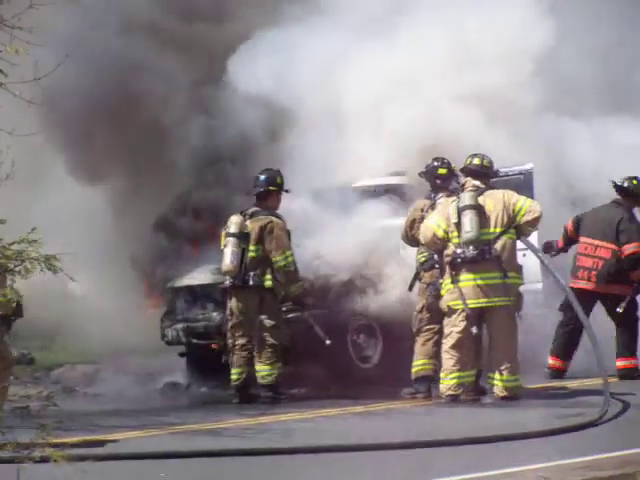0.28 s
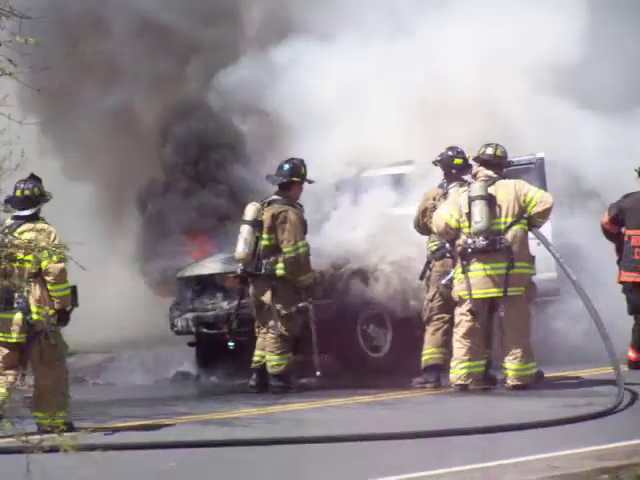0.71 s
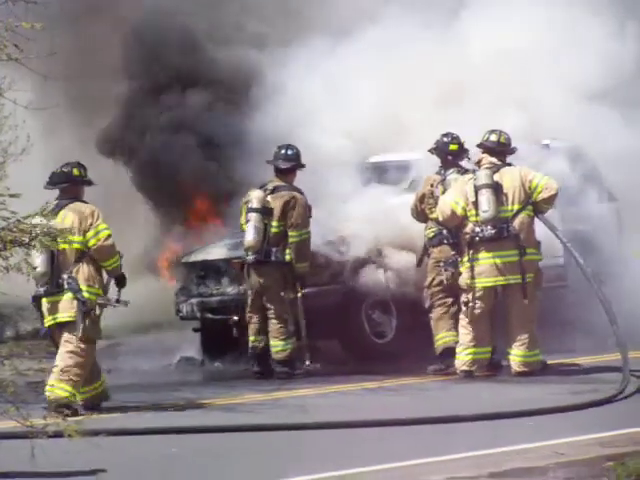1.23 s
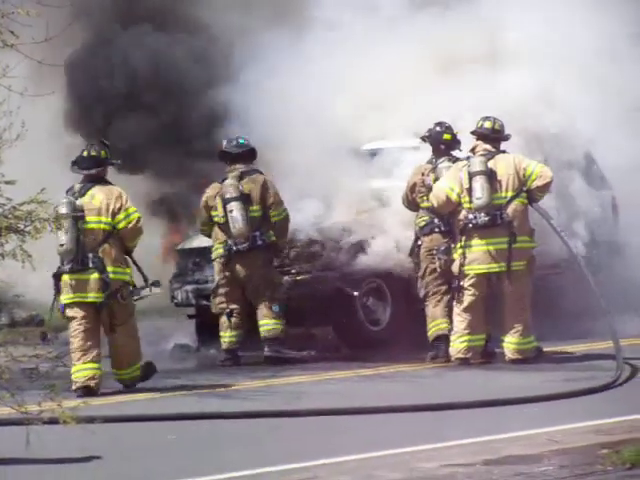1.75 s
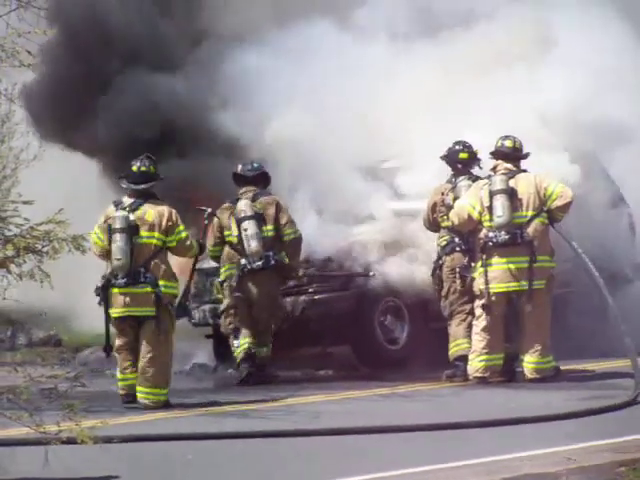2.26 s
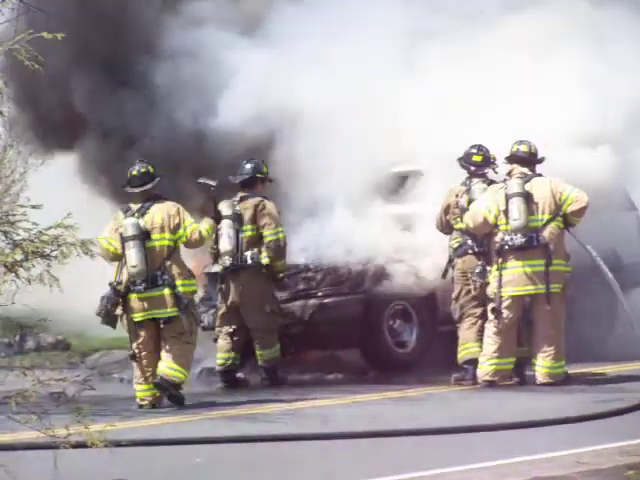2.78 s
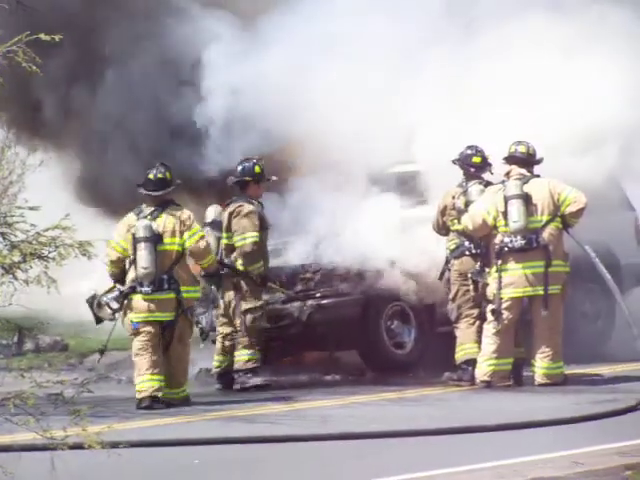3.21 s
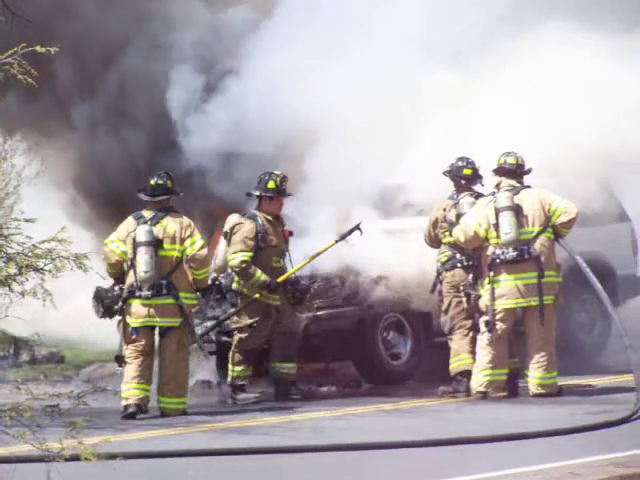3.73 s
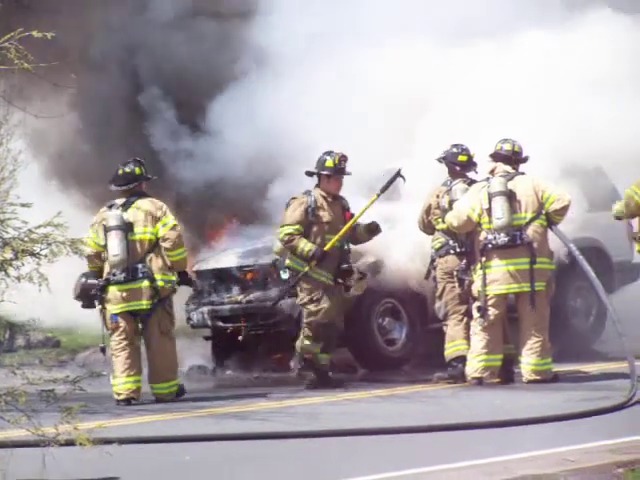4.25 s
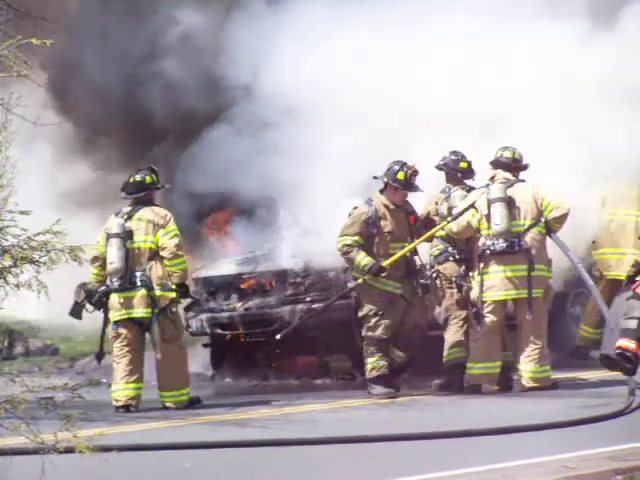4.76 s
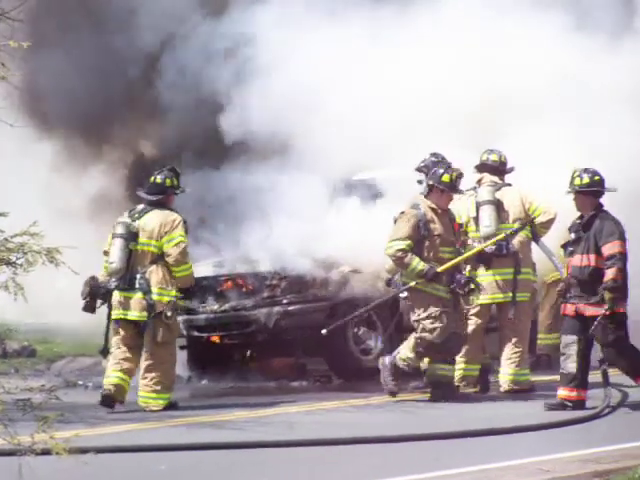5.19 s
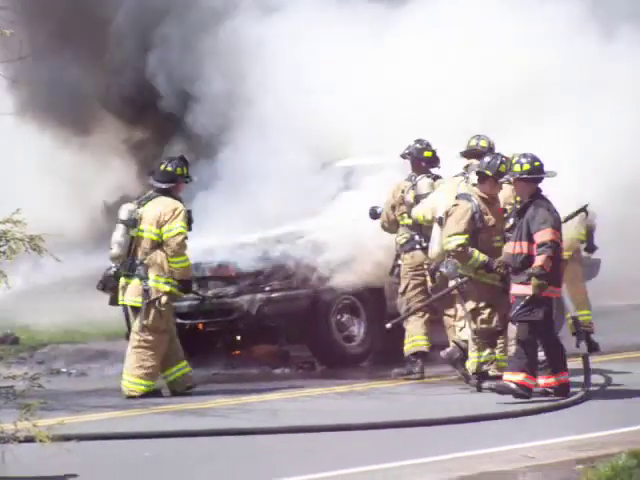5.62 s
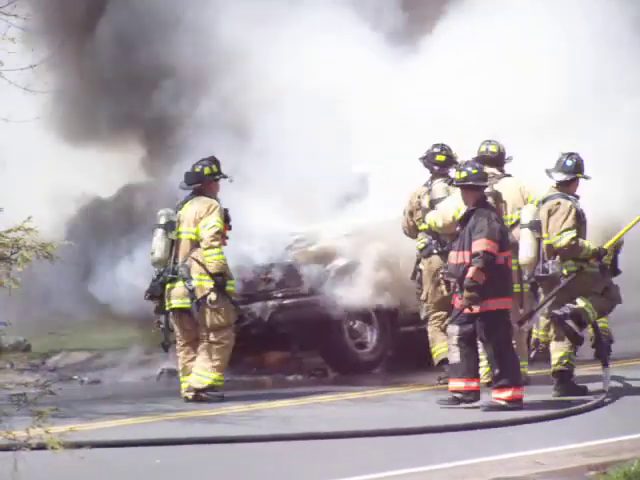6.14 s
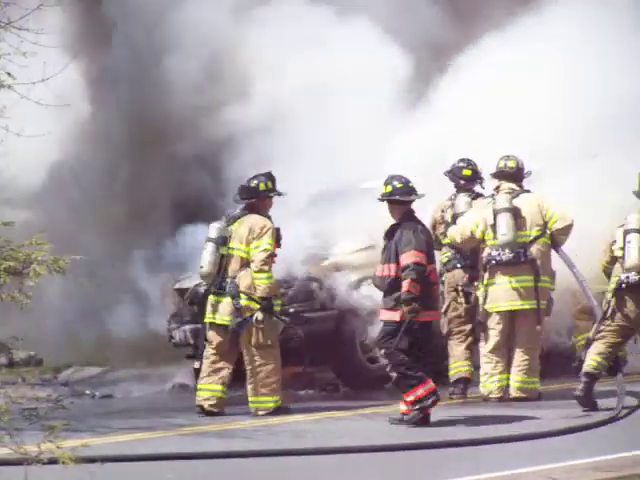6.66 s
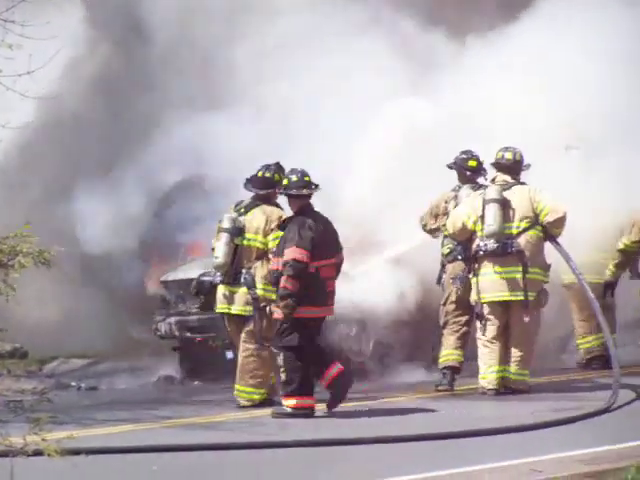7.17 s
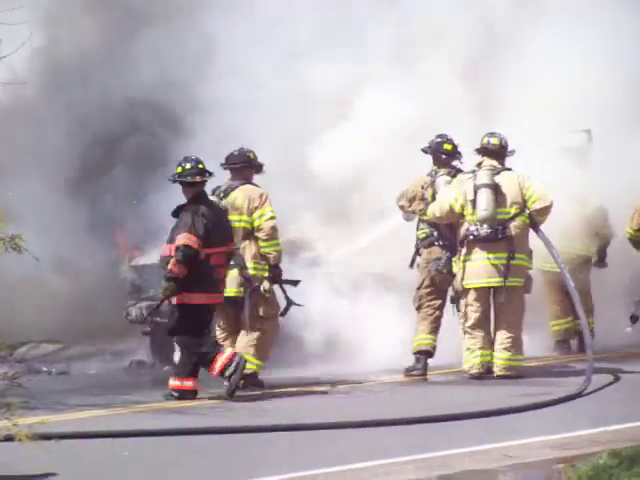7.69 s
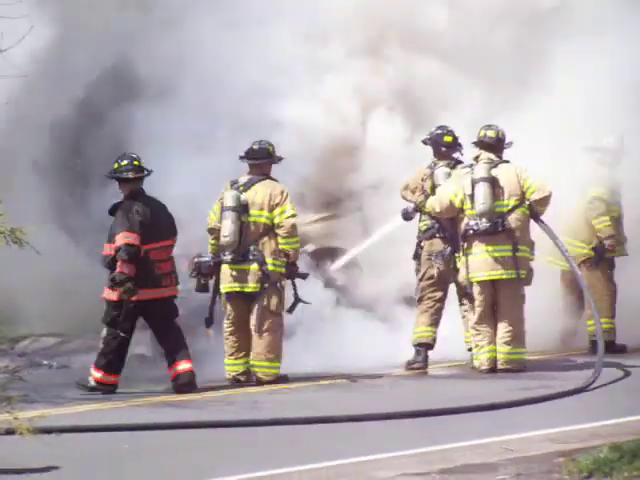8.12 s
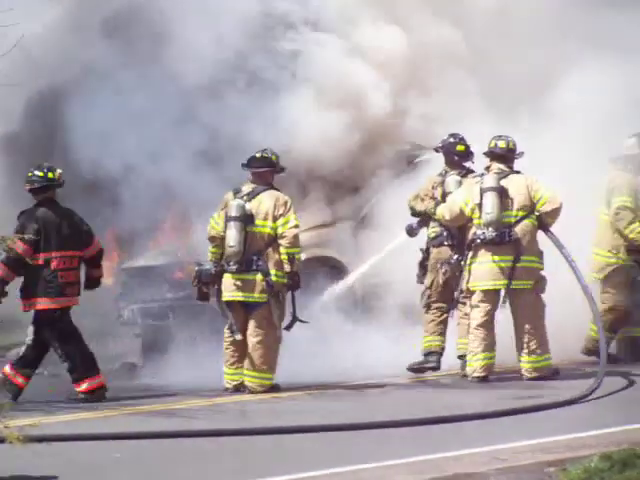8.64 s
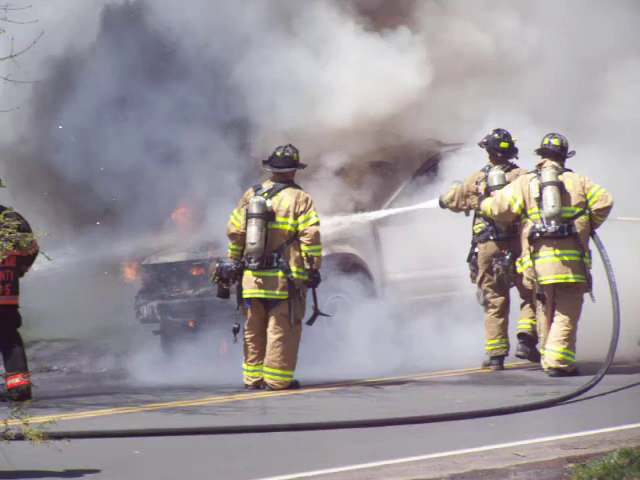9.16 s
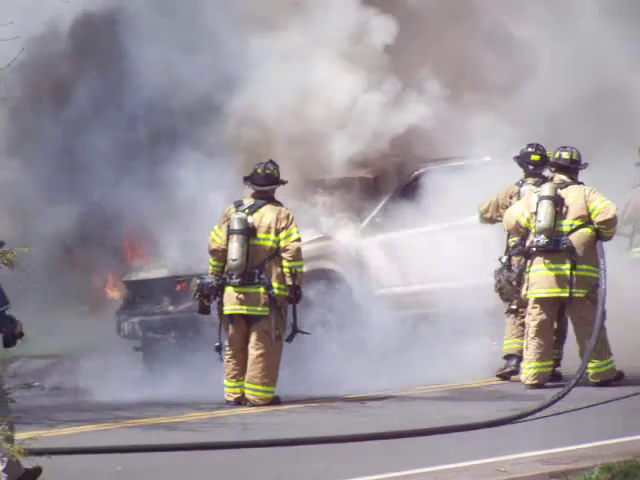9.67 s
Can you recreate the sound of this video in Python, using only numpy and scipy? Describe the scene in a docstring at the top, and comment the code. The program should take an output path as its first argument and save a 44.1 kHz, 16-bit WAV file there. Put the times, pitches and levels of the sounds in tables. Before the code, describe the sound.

A fire engine holds a steady high idle on an open street, its low exhaust drone topped by light clatter and a faint pump whine. A hose nozzle hisses throughout. The water jet flicks across a car in short splashes, and a dry double tap sounds once. Later the jet stays on in loud passes, splashing and drumming on sheet metal while the microphone's level dips. The engine sags slightly before one last splash.

```python
"""A fire engine holds a high idle to drive its pump beside a burning car on an open street.
Throughout, the exhaust drones, the block clatters and a hose nozzle hisses. At first the jet only
flicks across the car; a dry double tap sounds at 3.2 s. From 6.1 to 9 s the jet is held on in passes,
splashing and drumming on the sheet metal, and a gain control ducks everything while the water is loud.
The engine sags a little, and the jet lands once more at 9.8 s."""
import sys
import numpy as np
from scipy import signal
from scipy.fft import rfft, irfft, next_fast_len
from scipy.io import wavfile

SR = 44100
rng = np.random.default_rng(int(sys.argv[2]) if len(sys.argv) > 2 else 0)


def inscribe(sig):
    """Save sig as 16-bit PCM at rate SR to the path in sys.argv[1].

    A 1-D sig is mono; a 2-D sig holds one channel per row.
    Samples are clipped to [-1, 1] before scaling.
    """
    pcm = np.round(np.clip(np.atleast_2d(sig).T, -1, 1) * 32767)
    wavfile.write(sys.argv[1], SR, pcm.astype(np.int16))


N = 436590
TIME = np.arange(N) / SR


def from_db(db):
    """Decibels to gain."""
    return 10 ** (np.asarray(db) / 20)


def rms_one(x):
    """Scale to unit power."""
    return x / np.sqrt(np.mean(x ** 2) + 1e-20)


def drift(rate_hz):
    """Slow random wander, rms about 1."""
    hop, settle = 40, 2000
    r = np.exp(-2 * np.pi * rate_hz * hop / SR)
    noise = rng.standard_normal(N // hop + settle + 2)
    slow = signal.lfilter([1], [1, -2 * r, r * r], noise)[settle:]
    return np.interp(np.arange(N) / hop, np.arange(len(slow)), rms_one(slow))


def swells(rows):
    """Gaussian rises and falls; one gain curve per level column."""
    return sum(from_db(levels_db)[:, None] * np.exp(-np.minimum((2 * (TIME - mid_s) / length_s) ** 2, 20))
               for mid_s, length_s, *levels_db in rows)


def coloured(x, spectrum):
    """Apply a spectrum, falling 30 dB per octave beyond its ends; rms 1."""
    size = next_fast_len(N)
    hz, db = np.transpose(spectrum)
    octave, points = np.log2(np.fft.rfftfreq(size, 1 / SR) + 1), np.log2(hz)
    beyond = np.abs(octave - np.clip(octave, points[0], points[-1]))
    gain = from_db(np.interp(octave, points, db) - 30 * beyond)
    return rms_one(irfft(rfft(x, size) * gain, size)[:N])


def resonate(x, modes, top_hz=6000):
    """Steep parallel resonances, each driven by a differently shifted copy of x; rms 1."""
    out = 0
    for k, (hz, width_hz, db) in enumerate(modes):
        r = np.exp(-np.pi * width_hz / SR)
        b = (1 - r * r) / 2 * np.array([1, 0, -1])
        a = [1, -2 * r * np.cos(2 * np.pi * hz / SR), r * r]
        drive = np.roll(x, k * SR)
        out = out + from_db(db) * signal.lfilter(b, a, signal.lfilter(b, a, drive))
    return rms_one(signal.sosfilt(signal.butter(6, top_hz, fs=SR, output="sos"), out))


# hum lines: f/Hz, rms level/dB
HUM_LINES = [(128.2, -34.5), (178.3, -38.5), (256.5, -37), (358, -45.5), (567, -60.5)]

def hum(waver_db):
    """Faint tones, not locked to the crankshaft, that beat against the engine."""
    out = 0
    for hz, db in HUM_LINES:
        gain = from_db(db + waver_db * drift(0.95))
        out = out + gain * np.sin(2 * np.pi * hz * TIME + drift(0.78))
    return np.sqrt(2) * out


def tones(cycles, lines, waver_db):
    """Lines locked to the crankshaft, wavering on their way through the air."""
    out = 0
    for order, db in lines:
        gain = from_db(db + waver_db * drift(1.0))
        out = out + gain * np.sin(2 * np.pi * (round(order) * cycles + rng.random()))
    return np.sqrt(2) * out


# whine lines: order (multiple of the cycle rate), rms level/dB
WHINE_ORDERS = [(32, -55), (35, -55), (36, -47.5), (38, -50.5), (42, -48.5), (44, -44.5), (45, -50),
                (46, -57), (47, -54), (50, -54.5), (51, -59.5), (53, -55), (56, -49.5), (57, -52.5)]

def whine(cycles):
    """Pump and gears sing at high orders of the engine cycle."""
    return tones(cycles, WHINE_ORDERS, waver_db=1.0)


# exhaust overtones: order, relative level/dB
OVERTONE_ORDERS = [(20, 4), (24, -4), (28, -5.5)]
# their swells: middle t/s, length/s, level/dB
OVERTONE_SWELLS = [(1.83, 0.22, -55), (3.87, .3, -53), (6.03, 0.23, -41.5)]

def overtones(cycles, rest_db):
    """Upper exhaust orders that swell now and then."""
    gain = from_db(rest_db) + swells(OVERTONE_SWELLS)[0]
    return gain * tones(cycles, OVERTONE_ORDERS, waver_db=1.5)


# block clatter spectrum: f/Hz, relative density/dB
CLATTER_SPECTRUM = [(400, -7.5), (650, -16.5), (800, -3), (1000, -3.5), (1250, -1.5), (1600, -6.5),
                    (2200, -3), (3000, -10), (5000, -23), (8000, -46.5)]

def clatter(cycles, repeating, throb):
    """Valves and injectors rattle partly alike in every cycle, partly at random."""
    size = 2048
    one_cycle = irfft(np.exp(2j * np.pi * rng.random(size // 2 + 1)))
    alike = rms_one(np.interp(cycles % 1 * size, np.arange(size), one_cycle))
    beat = 1 + throb * sum(np.cos(2 * np.pi * order * cycles) for order in (2, 3, 8))
    return coloured((repeating * alike + rng.standard_normal(N)) * beat, CLATTER_SPECTRUM)


# rumble spectrum: f/Hz, relative density/dB
RUMBLE_SPECTRUM = [(8, -10), (25, -6), (80, -2), (160, 0), (330, -.5), (400, -5.5), (560, -13), (700, -16),
                   (1200, -32)]

def rumble():
    """Steady low engine noise."""
    return coloured(rng.standard_normal(N), RUMBLE_SPECTRUM)


# exhaust harmonics: order, relative level/dB
EXHAUST_ORDERS = [(2, -37.5), (3, -35.5), (4, -2.5), (5, -10), (6, -15.5), (7, -15.5), (8, -20.5), (9, 2),
                  (10, -10.5), (11, -5), (12, -1.5), (13, -11), (14, -26), (15, -10.5), (16, -7.5),
                  (17, -14), (18, -33), (19, -32.5), (20, -44.5), (21, -29), (22, -31.5)]

def exhaust(cycles, wander_db, uneven_db, imbalance_rad):
    """Each cycle sends one lopsided train of puffs down the pipe, which rings after it."""
    size = 256
    orders, db = np.transpose(EXHAUST_ORDERS)
    log_gain = np.log(from_db(np.interp(np.arange(size // 2 + 1), orders, db)))
    pipe_rad = 2 * rfft(irfft(log_gain)[:size // 2], size).imag  # causal pipe: minimum phase
    out = 0
    for order, level_db in EXHAUST_ORDERS:
        k = int(round(order))
        lag_rad = imbalance_rad * (k % 2)  # odd orders come from unequal cylinders and trail
        phase = 2 * np.pi * k * cycles + pipe_rad[k] - lag_rad
        out = out + from_db(level_db + wander_db * drift(0.75)) * np.cos(phase)
    return rms_one(out) * from_db(uneven_db * drift(8.4))


# governed speed, sagging at the end: t/s, working cycle rate/Hz
ENGINE_SPEED = [(0, 21.70), (1.8, 21.79), (6.2, 21.80), (8.1, 21.865), (9, 21.62), (9.9, 21.51)]

def engine():
    """Drone, whine and clatter follow the governed speed, over a steady rumble."""
    rate_hz = np.interp(TIME, *np.transpose(ENGINE_SPEED))
    cycles = np.cumsum(rate_hz * (1 + 0.00046 * drift(6.7))) / SR
    drone = from_db(-16.6) * exhaust(cycles, wander_db=0.3, uneven_db=0.12, imbalance_rad=1.25)
    high_tones = whine(cycles) + overtones(cycles, rest_db=-53)
    block = from_db(-35.0) * clatter(cycles, repeating=0.39, throb=0.19)
    return drone + high_tones + block + from_db(-33.5) * rumble()


# blows: t/s, level/dB
KNOCK_BLOWS = [(3.211, -30), (3.218, -24)]
# struck modes: f/Hz, gain/dB, t60/s
KNOCK_RING = [(520, -11, 0.053), (690, -6, 0.024), (880, -6, 0.028), (1100, 5, .025), (1370, 0, .025),
              (1700, 3, 0.014), (2180, -2, .02)]

def knocks():
    """A dry double tap by the car: each blow rings the same damped modes."""
    clicks, out = np.zeros(N), 0
    for t_s, db in KNOCK_BLOWS:
        clicks[int(t_s * SR)] = from_db(db)
    for hz, db, t60_s in KNOCK_RING:
        r, w = from_db(-60 / (t60_s * SR)), 2 * np.pi * hz / SR
        ring = signal.lfilter([0, np.sin(w)], [1, -2 * r * np.cos(w), r * r], clicks + 1e-18)
        out = out + from_db(db) * ring
    return out


def droplets(per_s, size_db, mist, sputter_db):
    """Drop impacts of uneven size in fine mist; the stream breaks into slugs and sputters."""
    sizes = from_db(size_db * np.minimum(rng.exponential(1, N), 4)) * rng.choice([-1, 1], N)
    hits = rms_one(sizes * (rng.random(N) < per_s / SR))
    return (hits + mist * rng.standard_normal(N)) * from_db(sputter_db * drift(45))


# nozzle hiss spectrum: f/Hz, relative density/dB
NOZZLE_SPECTRUM = [(1300, -29), (1700, -15.5), (2180, -0.5), (2600, -12.5), (2850, -3.5), (3150, -10.5),
                   (3600, -5.5), (4050, 1), (4450, -3.5), (5100, -10.5), (5700, -19.5), (6500, -28.5),
                   (7200, -28), (8500, -46)]

def nozzle(level_db):
    """Water tears out of the wide-open nozzle into a fine spray."""
    spray = droplets(per_s=5000, size_db=2.5, mist=1.4, sputter_db=0.34)
    return from_db(level_db) * coloured(spray, NOZZLE_SPECTRUM)


# jet held on the car: start t/s, rise/s, length/s, splash/dB, panel/dB, wheel well/dB, fade/(dB/s)
JET_PASSES = [(6.125, 0.027, 0.12, -16.5, -18.5, -17.5, -3), (6.247, .05, 0.25, -24, -33, -31, 29),
              (7.074, 0.057, 0.28, -19.5, -22, -35, 23), (7.3, 0.25, 0.8, -14.5, -23, -10.5, 5.5),
              (8.255, 0.05, 0.756, -19.5, -26.5, -24, 11), (9.792, 0.037, .12, -26, -27, -42, 2)]

def passes(run_off_db_per_s, wobble_db, wobble_hz):
    """The hand-held jet lands, wobbles, slides off the metal: gains of splash, panel and wheel well."""
    gains = 0
    for start_s, rise_s, length_s, *levels_db, fade_db_per_s in JET_PASSES:
        age_s = np.maximum(TIME - start_s, 0)
        slide_db = fade_db_per_s * np.minimum(age_s, length_s)
        run_off_db = run_off_db_per_s * np.maximum(age_s - length_s, 0)
        envelope = np.minimum(age_s / rise_s, 1) * from_db(-np.minimum(slide_db + run_off_db, 100))
        gains = gains + from_db(levels_db)[:, None] * envelope
    return [gain * from_db(wobble_db * drift(wobble_hz)) for gain in gains]


# jet flicking across the car: middle t/s, length/s, splash/dB, panel/dB, slap/dB
JET_FLICKS = [(0.036, 0.058, -27, -31, -46), (0.239, 0.08, -24, -31, -37), (0.368, 0.026, -23, -21.5, -25),
              (0.384, 0.009, -20.5, -23, -16), (1.71, 0.13, -24.5, -32, -54),
              (2.839, 0.1, -23.5, -24.5, -27), (5.464, 0.035, -26, -27, -35), (5.826, 0.044, -25, -32, -45),
              (6.01, 0.09, -21.5, -30.5, -58), (6.331, 0.0032, -14, -41, -42), (6.52, 0.03, -33, -29, -48),
              (7.23, 0.19, -51, -50, -29)]
# splash spectrum: f/Hz, relative density/dB
SPLASH_SPECTRUM = [(600, -16.5), (1200, -7.5), (2000, -10.5), (2650, -18), (2950, -5.5), (3300, -4.5),
                   (3700, 5.5), (4300, 2.5), (4700, -1.5), (5200, -3), (5750, -16), (6250, -22.5),
                   (6700, -18), (8500, -43)]
# resonances under the jet: f/Hz, width/Hz, relative level/dB
PANEL_MODES = [(1950, 310, -1.5), (2217, 390, 0)]
WELL_MODES = [(2960, 380, -10.5), (3730, 240, -4), (3924, 520, -0.5), (4210, 300, -11)]
SLAP_MODES = [(855, 220, 0), (1220, 700, 9), (1715, 1300, 0.5)]

def jet_on_car():
    """Drops splash off the body, drum and slap on its panels and ring in the wheel well."""
    splash_held, panel_held, well_held = passes(run_off_db_per_s=165.5, wobble_db=1.86, wobble_hz=3.9)
    splash_flick, panel_flick, slap_flick = swells(JET_FLICKS)
    splash = coloured(droplets(per_s=2500, size_db=3.0, mist=0.7, sputter_db=-0.2), SPLASH_SPECTRUM)
    panel = resonate(droplets(per_s=1300, size_db=-1.5, mist=0.88, sputter_db=1.6), PANEL_MODES)
    well = resonate(droplets(per_s=3600, size_db=5, mist=0.7, sputter_db=1.0), WELL_MODES)
    slap = resonate(droplets(per_s=1800, size_db=3.0, mist=1.0, sputter_db=7.0), SLAP_MODES)
    return ((splash_held + splash_flick) * splash + (panel_held + panel_flick) * panel
            + well_held * well + slap_flick * slap)


def scene():
    """Engine and hose in the open air; mono."""
    return (engine() + hum(waver_db=1.3) + nozzle(level_db=-29.5) + jet_on_car() + knocks())[None]


def gain_control(x, threshold_db, slope, attack_s, release_db_per_s, sense_hz):
    """Loud treble turns everything down quickly; the gain then recovers."""
    treble = signal.sosfilt(signal.butter(2, sense_hz, "high", fs=SR, output="sos"), x[0])
    r = np.exp(-1 / (attack_s * SR))
    level_db = 10 * np.log10(signal.lfilter([1 - r], [1, -r], treble ** 2) + 1e-12)
    cut_db = np.maximum(level_db - threshold_db, 0) * slope
    release_db = release_db_per_s * TIME
    held_db = np.maximum.accumulate(cut_db + release_db) - release_db
    return x * from_db(-signal.lfilter([1 - r], [1, -r], held_db))


def record(dry):
    """Gain control, then a steep low-pass, 60 dB down at 9.6 kHz."""
    ducked = gain_control(dry, threshold_db=-25.0, slope=0.62, attack_s=0.008,
                          release_db_per_s=52.5, sense_hz=1510)
    return signal.sosfilt(signal.cheby2(14, 60, 9600, fs=SR, output="sos"), ducked)


dry = scene()
out = record(dry)
inscribe(out)
```